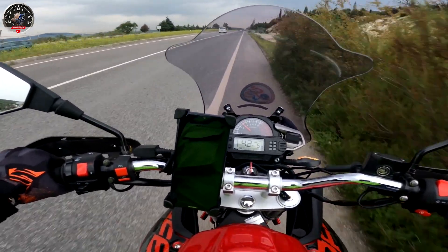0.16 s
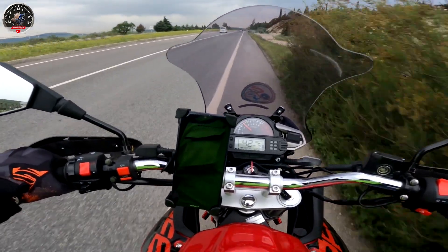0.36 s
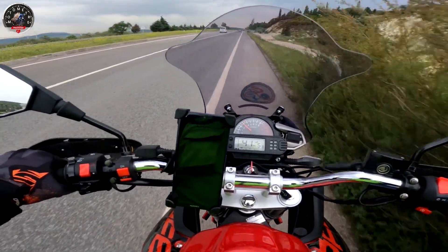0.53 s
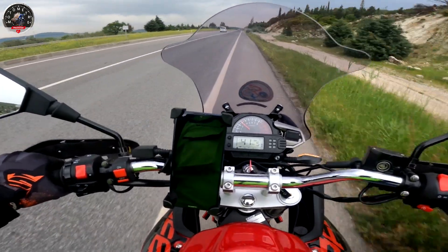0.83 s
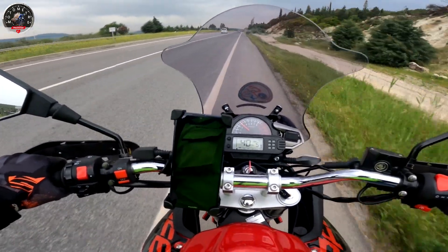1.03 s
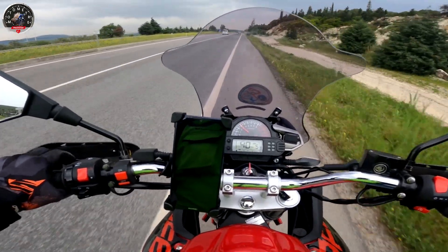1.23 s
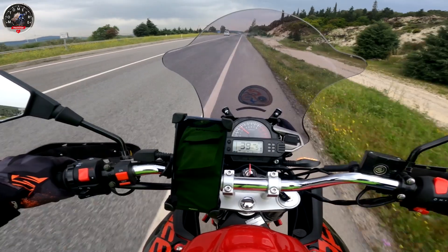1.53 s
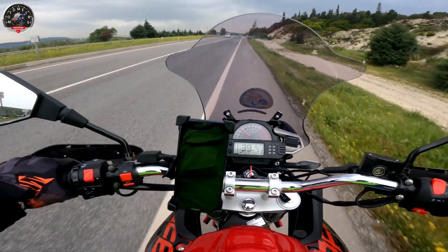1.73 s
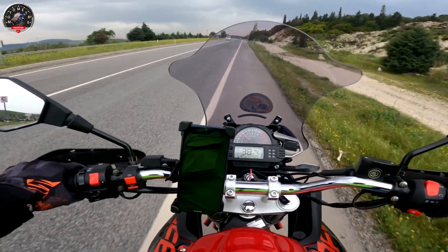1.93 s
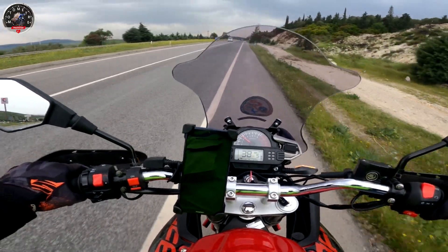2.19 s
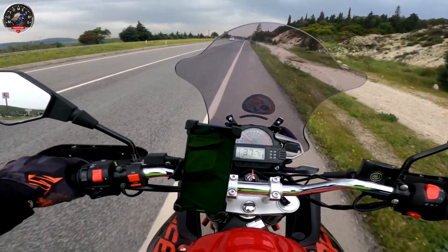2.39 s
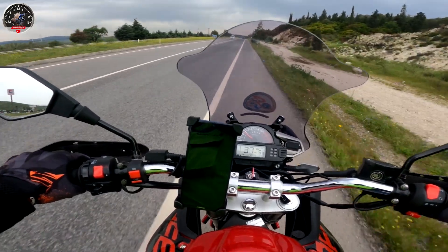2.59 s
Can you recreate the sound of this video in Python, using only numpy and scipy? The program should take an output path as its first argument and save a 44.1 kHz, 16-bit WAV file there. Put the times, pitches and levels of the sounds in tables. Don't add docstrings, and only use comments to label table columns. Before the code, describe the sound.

A single-cylinder motorcycle engine beats steadily, then its firing cuts out, leaving dull air-pumping thumps, wind buffets and tyre roar on an open road until it catches at the very end; close helmet microphone.

```python
import sys
import numpy as np
from scipy import signal
from scipy.io import wavfile
from scipy.ndimage import uniform_filter1d

SR = 44100
rng = np.random.default_rng(int(sys.argv[2]) if len(sys.argv) > 2 else 0)


def how_loud(loudness_db):
    steps = np.asarray(loudness_db, float) / 20
    return 10 ** steps


def generate_wav(signal):
    frames = np.transpose(np.atleast_2d(signal))
    scaled = np.clip(frames, -1, 1) * 32767
    pcm = np.round(scaled).astype(np.int16)
    wavfile.write(sys.argv[1], SR, pcm)


N = 121275

# (frequency [Hz], level [dB])
WIND_SPECTRUM = [(3, -20), (6, 2.5), (25, -4), (42, -6.5), (65, -17), (100, -15), (200, -23), (400, -38.5)]
# (time [s], level [dB])
GUST_LEVEL = [(0.0, -24), (0.27, -30.5), (0.72, -24.5), (0.79, -27.5), (0.92, -22.5), (1.06, -26.5),
              (1.16, -25), (1.37, -20.5), (1.45, -22.5), (1.62, -25.5), (1.64, -42.5), (1.69, -26),
              (2.48, -25.5), (2.54, -25), (2.59, -22), (2.75, -33.5)]
# (time [s], peak level [dB], frequency [Hz], width [s])
WIND_BUFFETS = [
    (.03, -18, 60.3, 0.0077),
    (.55, -22, 45, 0.011),
    (0.712, -9, 44.5, 0.0063),
    (1.755, -18.5, 40, 0.0058),
    (1.938, -17, 50, 0.0026),
    (2.03, -11, 47, 0.0087),
    (2.272, -11, 46, .012),
    (2.328, -18, 46, 0.0062),
    (2.478, -10.5, 29.7, 0.0057),
]
# (frequency [Hz], level [dB])
ROAR_SPECTRUM = [(150, -41.5), (250, -12.5), (380, -7.5), (620, -19), (870, -13.5), (1230, -22.5),
                 (1480, -19), (1950, -23.5), (2200, -39)]
# (time [s], level [dB])
ROAD_LEVEL = [(0, -2.5), (.6, 0), (1.5, 0), (2.1, -2), (2.75, -0.5)]
# (frequency [Hz], width [Hz], level [dB])
ROAR_HOLLOWS = [(892.4, 44, -56), (1522, 130, -65), (207, 35, -37.5), (503, 60, -55.5)]
# (frequency [Hz], level [dB])
ROAD_HISS_SPECTRUM = [(1260, -27), (2150, -0.5), (2970, -3), (3840, -2.5), (4170, -5.5), (5800, -5),
                      (8920, -15), (11900, -12), (15500, -25)]
# (time [s], level [dB])
HUM_LEVEL = [(0, -48), (.2, -42.5), (.7, -48.5), (1.1, -51.5), (1.5, -46), (1.75, -47), (1.9, -41.5),
             (2.08, -50.5), (2.35, -48), (2.5, -45.5), (2.75, -45)]
# (time [s], level [dB], frequency [Hz], width [s])
STONE_TICKS = [
    (1.4545, -29, 800, .0006),
    (1.682, -51, 5800, .002),
    (1.883, -32, 600, .001),
    (2.63, -30, 400, .0015),
]
# (frequency [Hz], width [Hz], level [dB])
CASE_MODES = [(5640, 120, -1.5), (5890, 120, -2.5), (5020, 140, -2), (3735, 210, -2), (7270, 800, -0.5),
              (4430, 160, -5), (2600, 300, -6)]
# (time [s], level [dB])
RATTLE_LEVEL = [(0, -62.5), (.8, -61.5), (1.4, -62.5), (1.68, -58.5), (1.9, -63), (2.3, -69), (2.75, -57.5)]
# (frequency [Hz], level [dB])
VALVE_SPECTRUM = [(3710, -40), (6300, -20), (7140, -3), (7900, -7), (9050, -9.5), (10600, -1),
                  (14500, -9.5), (15500, -19.5)]
# (time [s], level [dB])
VALVE_LEVEL = [(0, -74.5), (.5, -63.5), (.9, -61), (1.3, -60), (1.9, -63.5), (2.2, -60), (2.45, -57.5),
               (2.75, -60)]
# (place [cycles from firing], level [dB], rise [s], decay [s])
VALVE_PUFFS = [
    (-.075, 0, .0015, .0065),
    (-.33, -6, .004, .008),
]
# (time [s], unevenness [dB])
PUFF_UNEVENNESS = [(0, -1), (1.4, 0.8), (1.8, -0.5), (2.3, 2), (2.45, 0), (2.75, 2)]
# (time [s], firing level [dB], thump level [dB], gulp snap level [dB])
THROTTLE_LEVELS = [(0, -1.5, -4, -6), (.3, 2, 0.5, -1), (1.0, 1.1, 1, 1.6), (1.6, 0.5, 0.5, 4),
                   (1.668, 1.5, -3.5, -0.5), (1.682, -16, 3, 6), (1.718, -1, -3, -17),
                   (1.735, -22, -7, -0.5), (1.8, -28, -1, -7.5), (2.0, -30, -6, -10),
                   (2.06, -28, -6, -13.5), (2.4, -26, 0, -11.5), (2.46, -33, -9, -8.5),
                   (2.69, -17, -6.5, -22), (2.71, 5, -0.5, 0), (2.75, -6.5, 18, -1)]
# (time [s], level [dB], frequency [Hz], width [s])
EXHAUST_POPS = [
    (.553, -19, 190, .009),
    (1.946, -26, 250, .003),
    (1.982, -11, 60, .004),
    (1.9955, -19, 215, .006),
    (2.335, -28, 230, .008),
]
# (frequency [Hz], level [dB], decay t60 [s], start from firing [s], rise [s])
EXHAUST_MODES = [
    (310, -10.2, .11, -.0008, .003),
    (225, -7.4, .05, -.0068, .012),
    (153, -8.3, .01, -.0017, .0006),
]


def evened(x):
    return x / np.sqrt(np.mean(x ** 2) + 1e-20)


def along(points, col=1):
    columns = np.transpose(points)
    return np.interp(np.arange(N) / SR, columns[0], columns[col])


def noise(spectrum, patchy_db, size=512):
    hop = size // 4
    bins_hz = np.fft.rfftfreq(size, 1 / SR)
    hz, db = np.transpose(spectrum)
    shape = np.interp(np.log(bins_hz + 1), np.log(hz + 1), db, left=-80, right=-80)
    real, imag, patches = rng.standard_normal((N // hop + 6, len(bins_hz), 3)).T
    patches = uniform_filter1d(patches, size=5, axis=0)
    patches = evened(uniform_filter1d(patches, size=12, axis=1))
    frames = (real + 1j * imag) * how_loud(shape[:, None] + patchy_db * patches)
    return evened(signal.istft(frames, nperseg=size, noverlap=size - hop)[1][:N])


def resonate(x, hz, width_hz):
    turn = np.exp(2j * np.pi * hz * np.arange(len(x)) / SR)
    r = np.exp(-np.pi * width_hz / SR)
    return 2 * (turn * signal.lfilter([1 - r], [1, -r], x / turn)).real


def burst(clicks, hz, width_s):
    t = np.arange(-3000, 3001) / SR
    pulse = np.cos(2 * np.pi * hz * t) * np.exp(-(t / width_s) ** 2 / 2)
    return -signal.oaconvolve(clicks, pulse, "same")


def single_bursts(events):
    out = np.zeros(N)
    for s, db, hz, width_s in events:
        click = 1. * (np.arange(N) == round(s * SR))
        out = out + how_loud(db) * burst(click, hz, width_s)
    return out


def cycles():
    t = np.arange(N) / SR
    cycles_per_s, sag, sag_ease, first_fire = 22.975, 1.5214, .05087, .2391
    return cycles_per_s * t - sag * t ** 2 / 2 + sag_ease * t ** 3 / 3 - first_fire


def beats(place, scatter_db):
    turn = np.floor(cycles() - place)
    size = how_loud(scatter_db * rng.standard_normal(80))
    return np.diff(turn, prepend=turn[0]) * size[turn.astype(int) + 2]


def wind():
    rumble = how_loud(along(GUST_LEVEL) + 4.0) * noise(WIND_SPECTRUM, patchy_db=0.5, size=8192)
    return rumble - single_bursts(WIND_BUFFETS)


def road():
    throb_db = 0.84 * np.cos(2 * np.pi * (cycles() + 0.48))
    roar = how_loud(-40 + throb_db) * noise(ROAR_SPECTRUM, patchy_db=0.5, size=1024)
    for hz, width_hz, db in ROAR_HOLLOWS:
        narrow = resonate(rng.standard_normal(N), hz, width_hz)
        roar = roar + how_loud(db) * evened(resonate(narrow, hz, 3 * width_hz))
    hiss = how_loud(-57) * noise(ROAD_HISS_SPECTRUM, patchy_db=1.94)
    return how_loud(along(ROAD_LEVEL)) * (roar + hiss)


def hum():
    hum_hz, width_hz, blur_level = 432, 9.1, 0.58
    tone = np.sin(2 * np.pi * hum_hz * np.arange(N) / SR)
    narrow = resonate(rng.standard_normal(N), hum_hz, width_hz)
    blur = evened(resonate(narrow, hum_hz, 3 * width_hz))
    return how_loud(along(HUM_LEVEL)) * evened(tone + blur_level * blur)


def stones():
    return single_bursts(STONE_TICKS)


def rattle():
    busiest_place, ticks_per_s = 0.27, 660
    busy = 1 + 0.75 * np.cos(2 * np.pi * (cycles() - busiest_place))
    struck = rng.random(N) < busy * ticks_per_s / SR
    size = how_loud(4.3 * np.minimum(rng.exponential(1, N), 3))
    ticks = struck * size * rng.choice([-1, 1], N)
    ring = np.zeros(N)
    for hz, width_hz, db in CASE_MODES:
        mode = resonate(resonate(ticks, hz, width_hz), hz, width_hz)
        ring = ring + how_loud(db) * evened(mode)
    return how_loud(along(RATTLE_LEVEL)) * evened(ring)


def valves():
    t = np.arange(3000) / SR
    alternation = 2 * (np.round(cycles()) % 2) - 1.5
    uneven = how_loud(along(PUFF_UNEVENNESS) * alternation)
    gate = np.zeros(N)
    for place, db, rise_s, decay_s in VALVE_PUFFS:
        puff = np.minimum(t / rise_s, 1) * np.exp(-t / decay_s)
        clicks = beats(place, scatter_db=.8) * uneven
        gate = gate + how_loud(db) * signal.oaconvolve(clicks, puff)[:N]
    hiss = noise(VALVE_SPECTRUM, patchy_db=1.1, size=256)
    return how_loud(along(VALVE_LEVEL)) * 2 * gate * hiss


def pumping():
    thumps = beats(-.28, scatter_db=.8) * how_loud(along(THROTTLE_LEVELS, col=2))
    snaps = beats(-.298, scatter_db=.8) * how_loud(along(THROTTLE_LEVELS, col=3))
    thump = how_loud(-18) * burst(thumps, hz=72, width_s=.009)
    snap = how_loud(-15) * burst(snaps, hz=245, width_s=.0028)
    return thump + snap + single_bursts(EXHAUST_POPS)


def firing():
    shut_s, shut_fade_s = .05, .021
    lead = 1000
    t = np.arange(-lead, 3000) / SR
    ring = np.zeros(len(t))
    for hz, db, t60, start, rise in EXHAUST_MODES:
        u = np.maximum(t - start, 0)
        decay = how_loud(db - 60 * u / t60)
        ring = ring - decay * np.sin(2 * np.pi * hz * u) * (1 - np.exp(-u / rise))
    ring = ring * np.clip((shut_s - t) / shut_fade_s, 0, 1)
    clicks = np.r_[beats(0, scatter_db=.35), np.zeros(lead)]
    exhaust = signal.oaconvolve(clicks, ring)[lead:N + lead]
    return how_loud(along(THROTTLE_LEVELS)) * exhaust


def scene():
    background = wind() + road() + hum() + stones()
    engine = rattle() + valves() + pumping() + firing()
    return (background + engine)[None]


def roll_off(x):
    return signal.sosfilt(signal.butter(12, 15680, fs=SR, output="sos"), x)


def record(dry):
    mix = 0.85 * np.tanh(dry / 0.89)
    return roll_off(mix)


dry = scene()
out = record(dry)
generate_wav(out)
```